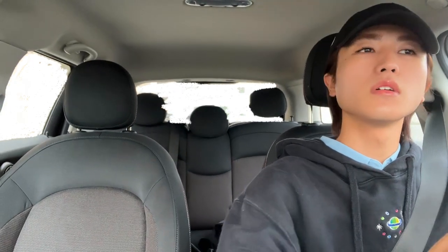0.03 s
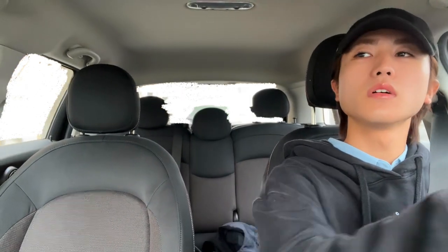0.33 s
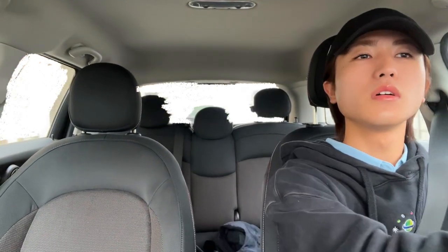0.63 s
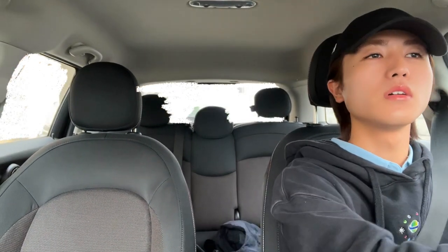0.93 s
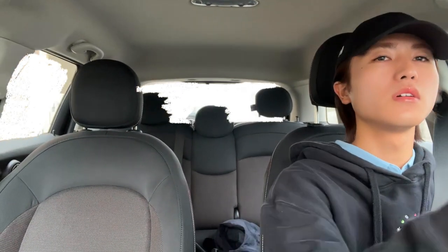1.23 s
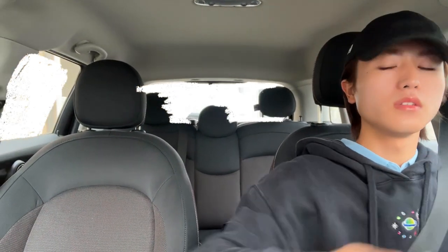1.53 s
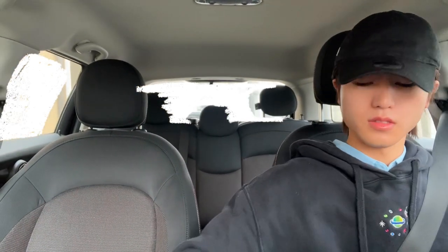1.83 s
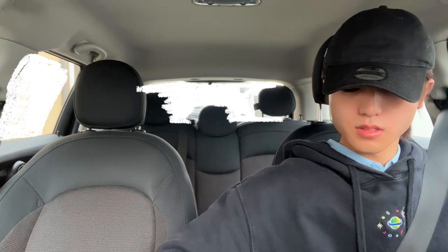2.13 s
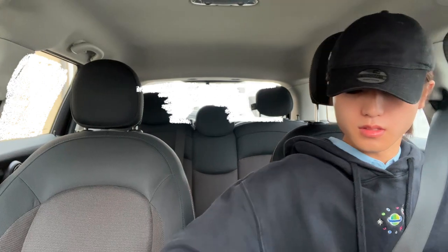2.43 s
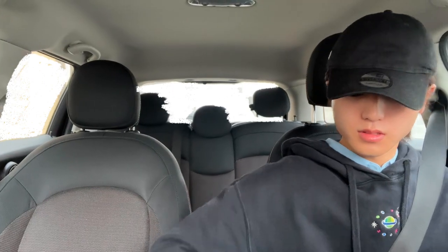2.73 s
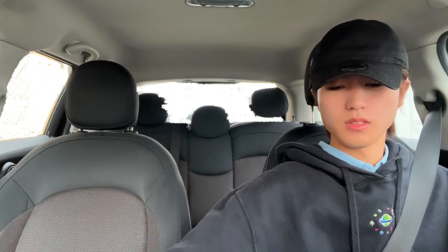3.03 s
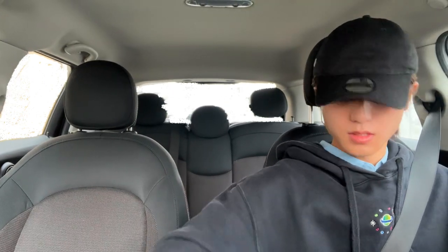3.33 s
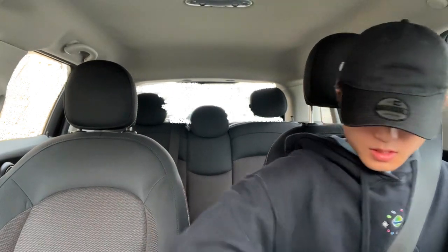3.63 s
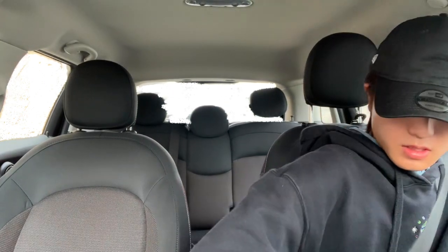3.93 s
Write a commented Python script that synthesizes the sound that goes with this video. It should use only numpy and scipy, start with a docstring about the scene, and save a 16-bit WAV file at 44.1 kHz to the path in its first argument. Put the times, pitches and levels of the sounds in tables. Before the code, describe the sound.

A car lever clicks and thuds home over an idling engine, then a seat belt buckle snaps.

```python
"""First comes the low throb of an idling engine, heard inside a car, and soon the swish of a sleeve.
Fingers scuff the console and seat belt fittings tick as the idle slows. A lever's catch clicks through
three notches and the lever thuds home, shaking the trim; then the belt buckle snaps and rattles.
Clicks are bursts of noise, most with short ringing tones. The padded cabin hardly echoes,
and two microphones close together pick it all up."""
import sys
import numpy as np
from scipy import signal
from scipy.fft import rfft, irfft
from scipy.io import wavfile

SR = 44100
rng = np.random.default_rng(int(sys.argv[2]) if len(sys.argv) > 2 else 0)


def waveform_to_disk(signal):
    """Save audio, clipped to [-1, 1], as 16-bit WAV at the path in sys.argv[1]."""
    frames = np.transpose(np.atleast_2d(signal))
    scaled = np.clip(frames, -1, 1) * 32767
    samples = np.round(scaled).astype(np.int16)
    wavfile.write(sys.argv[1], SR, samples)


N = 176400
TIME = np.arange(N) / SR
LEAD_S = .05  # room for a hit to swell before its peak
HIT_TIME = np.arange(SR // 3) / SR - LEAD_S
HIT_SIZE = len(HIT_TIME)


def amp(db):
    """Turns decibels into a number to multiply by."""
    return 10 ** (np.asarray(db) / 20)


def normalize(x):
    """Scales a signal to an average (rms) strength of 1."""
    return x / np.sqrt(np.mean(x ** 2) + 1e-20)


def lookup(table, x):
    """Reads between the rows of a two-column table."""
    return np.interp(x, *np.transpose(table))


def at_pitch(table, hz):
    """Reads between the rows of a frequency table, spacing octaves evenly."""
    row_hz, value = np.transpose(table)
    return np.interp(np.log(hz + 1), np.log(row_hz + 1), value)


def pan(db):
    """Two gains that make the left side db louder than the right."""
    return amp([[db / 2], [-db / 2]])


def add(mix, start_s, sound):
    """Mixes a sound in, cutting off whatever does not fit."""
    at = round(start_s * SR)
    sound = sound[:, max(-at, 0):]
    part = mix[:, max(at, 0):][:, :sound.shape[1]]
    part += sound[:, :part.shape[1]]


def drift(rate_hz):
    """A random wobble, moving up to about rate_hz times a second."""
    hz = np.fft.rfftfreq(N, 1 / SR)
    return normalize(irfft(rfft(rng.standard_normal(N)) * np.exp(-(hz / rate_hz) ** 2), N))


# Sound from all around. Each row: frequency in Hz, how alike the two sides are from -1 to 1.
SIDES_ALIKE = [(50,0.62),(120,1),(250,0.15),(700,-0.23),(2000,0.12),(8000,-0.35),(15000,-0.82)]
# Near sounds reach the left microphone first. Each row: frequency in Hz, head start in radians.
LEFT_LEAD = [(60,0.4),(150,0.62),(300,1.19),(800,0.96),(1400,.9),(2800,1.16),(5600,1.65),(8500,2.15),(15000,2.3)]
# Balance of near sounds. Each row: frequency in Hz, left level minus right in dB.
BALANCE = [(300,-4),(1200,-5),(2500,-2),(8000,-1.5),(14000,1)]

def noise(spectrum, size, tilt_db=0, near=False):
    """Stereo noise from nearby or all around; tilt_db brightens it per octave above 600 Hz."""
    hz = np.fft.rfftfreq(size, 1 / SR)
    if near:
        left = np.exp(2j * np.pi * rng.random((2, len(hz))))[0]
        right = left * np.exp(-1j * at_pitch(LEFT_LEAD, hz))
        sides = np.array([left, right]) * pan_by_pitch(hz)
    else:
        left, other = rfft(rng.standard_normal((2, size)))
        alike = at_pitch(SIDES_ALIKE, hz)
        sides = np.array([left, alike * left + np.sqrt(1 - alike ** 2) * other])
    octaves = np.log2(np.maximum(hz, 600) / 600)
    return normalize(irfft(sides * amp(at_pitch(spectrum, hz) + tilt_db * octaves), size))


def pan_by_pitch(hz):
    """Left and right gains of a near sound at each frequency."""
    return amp(at_pitch(BALANCE, hz) * np.array([[.5], [-.5]]))


def hit(rise_s, fade_s):
    """Loudness of a hit: a quick swell, then a fade. A fade time is how long it takes to drop 60 dB."""
    return np.exp(np.minimum(HIT_TIME, 0) / rise_s - np.log(1000) * np.maximum(HIT_TIME, 0) / fade_s)


def clack(rise_s, fade_s, crack_db=4.5):
    """Loudness of a hard contact: a sharp crack, then the rattle of the housing."""
    crack = amp(crack_db) * hit(rise_s / 2, fade_s=.0033)
    return np.hypot(crack, hit(rise_s, fade_s)) / np.sqrt(2)


def ring(tones, rise_s, in_step=False):
    """The fading tones of a struck part; a blunt push starts them all in step."""
    out = 0
    for hz, db, fade_s in tones:
        turn = 0 if in_step else rng.random()
        phase = 2 * np.pi * (hz * HIT_TIME + turn) - np.array([[0], [at_pitch(LEFT_LEAD, hz)]])
        out = out + amp(db) * pan_by_pitch(hz) * hit(rise_s, fade_s) * np.cos(phase)
    return out


# Engine speed. Each row: time in seconds, cycles per second.
ENGINE_SPEED = [(0.0, 24.64), (0.731, 24.59), (1.481, 25.74), (1.73, 25.15), (1.86, 23.45), (2.0, 23.06),
                (2.29, 23.29), (3.48, 23.09), (3.62, 23.29), (4.0, 23.09)]

def engine_cycles():
    """Counts the cycles the engine has run so far."""
    return np.cumsum(lookup(ENGINE_SPEED, TIME)) / SR


# The hum before and after the idle slows. Each row: multiple of engine speed, relative level in dB.
FAST_HUM = [(1, -4), (2, 0), (3, -2), (4, -2.5), (5, -10), (6, -20), (7, -22), (8, -25.5), (9, -10.5),
            (10, -33), (11, -16.5), (12, -28.5), (13, -40), (14, -17), (15, -19.5), (16, -32), (17, -33.5),
            (18, -39)]
SLOW_HUM = [(1, -38.5), (2, 0.5), (3, -3), (4, -8), (5, -15), (6, -33.5), (7, -21.5), (8, -14.5), (9, -23),
            (10, -21.5), (11, -14), (12, -11), (13, -13), (14, -42.5), (15, -10), (16, -10.5), (17, -14.5),
            (18, -26), (19, -22.5)]
# Boom of the three deepest tones. Each row: time in seconds, boost in dB.
BOOM = [(0,7),(.13,3),(.2,-0.5),(.6,2),(.9,-5.5),(1.25,-1),(1.6,-4.5),(1.95,-1),(2.9,-0.5),(3.6,0),(4,-5)]

def engine():
    """Wavering tones at multiples of the engine's speed; their balance shifts as it slows."""
    settle_middle_s, settle_length_s = 1.89, .57
    waver, waver_hz = .21, 6.9
    cycles = engine_cycles()
    settled = np.clip((TIME - settle_middle_s) / settle_length_s + .5, 0, 1)
    right_lag = .0049 * ENGINE_SPEED[0][1] * np.array([[0], [1]])  # radians, for the lowest tone
    out = np.zeros((2, N))
    for k in range(1, len(SLOW_HUM) + 1):
        level = (1 - settled) * amp(lookup(FAST_HUM, k) - 36) + settled * amp(lookup(SLOW_HUM, k) - 34)
        if k <= 3:
            level = level * amp(lookup(BOOM, TIME))
        scatter = .57 * np.sqrt(k) if k < 11 else .27  # high tones bunch up into one chug
        phase = 2 * np.pi * (k * cycles + scatter * rng.random()) + waver * drift(waver_hz)
        out += np.sqrt(2) * level * (1 + waver * drift(waver_hz)) * np.cos(phase - k * right_lag)
    return out * pan(-4)


# Tone of the rumble and cabin air. Each row: frequency in Hz, relative level in dB.
RUMBLE_TONE = [(12,-27),(28,-10),(48,-2),(110,-7),(190,-13),(280,-12),(400,-19.5),(500,-26),(750,-32.5),(1100,-42.5),(2000,-53.5),(4000,-56.5),(8500,-60.5),(10500,-82),(13000,-76.5),(15500,-64.5)]
# Rise and fall of the rumble. Each row: time in seconds, level in dB.
RUMBLE_LEVEL = [(0,-37),(.4,-40),(0.899,-36.5),(1.25,-40.5),(1.8,-33),(2.2,-35),(2.7,-35),(3.3,-38.5),(4,-36)]

def rumble():
    """Dull engine noise pulses with each cycle, under the steady hiss of cabin air."""
    air = noise(RUMBLE_TONE, N) * pan(-2.5)
    low = signal.sosfiltfilt(signal.butter(2, 1500, fs=SR, output="sos"), air)
    db = lookup(RUMBLE_LEVEL, TIME)
    swell = amp(db + 1.37 * drift(rate_hz=18))
    throb = 1 + .2 * np.cos(2 * np.pi * engine_cycles())
    return swell * throb * low + amp(db.mean()) * (air - low)


# Sleeve and belt strokes. Each row: middle in seconds, half length in seconds, level in dB,
# brightness in dB per octave.
STROKES = [(0.238,0.22,-61.5,2),(0.697,0.045,-60,3.2),(0.774,0.047,-55.5,4),(0.948,0.07,-62.5,4),(1.361,0.096,-61,1),(1.538,0.12,-58.5,-2.7),(1.853,0.13,-60,3),(2.071,0.09,-58,2),(2.231,0.036,-64.5,2.5),
           (2.414,0.015,-54,-0.5),(2.739,.11,-57.5,-1),(2.94,0.022,-62,-3),(3.073,0.015,-58.5,-8),(3.137,0.08,-57,-17),(3.328,0.032,-61,1.5),(3.519,0.19,-62,-2.5),(3.604,0.036,-48.5,-1),(3.733,0.26,-62.5,-1),(3.951,0.082,-52,-1.5)]
# Tone of rubbing fabric. Each row: frequency in Hz, relative level in dB.
CLOTH_TONE = [(200,-11),(500,1.5),(900,11.5),(1300,4),(1750,0),(2400,3.5),(3000,0),(4500,-2),(6500,0.5),(8700,-3),(10500,-34.5),(12500,-19.5),(14200,-3),(15800,-9.5)]

def cloth():
    """Fabric rubs in grainy swishes as the driver reaches down."""
    out = np.zeros((2, N))
    t = np.arange(SR) / SR - .5
    for middle_s, half_s, db, tilt_db in STROKES:
        swell = amp(db) * 2 ** -(t / half_s) ** 2
        add(out, middle_s - .5, swell * noise(CLOTH_TONE, SR, tilt_db))
    grain_db = 1.5 * drift(rate_hz=1000)
    flutter_db = .6 * drift(rate_hz=21)
    return out * amp(grain_db + flutter_db)


# How hard fingers brush the console. Each row: time in seconds, typical level in dB.
FINGER_LEVEL = [(0,-84),(1.2,-77),(1.5,-64),(2.3,-59.5),(2.7,-54.5),(3,-66.5),(3.1,-52),(3.25,-62.5),(3.45,-62),(4,-46)]
# Tone of one scuff. Each row: frequency in Hz, relative level in dB.
SCUFF_TONE = [(300,-8.5),(650,7),(1550,-1),(3500,-15.5),(8000,-30)]

def fingers():
    """Faint, dull scuffs on plastic come at random and blend into a rustle."""
    scuffs_per_s, spread_db = 42, 4
    out = np.zeros((2, N))
    for when, bright, force in rng.random((round(scuffs_per_s * N / SR), 3)):
        s = when * N / SR
        db = lookup(FINGER_LEVEL, s) + spread_db * (2 * force - 1)
        scuff = noise(SCUFF_TONE, HIT_SIZE, tilt_db=3 * (2 * bright - 1))
        add(out, s - LEAD_S, amp(db) * hit(rise_s=.0036, fade_s=.04) * scuff)
    return out


# Ticks of the buckle, belt fittings and console. Each row: time in seconds, level in dB,
# rise and fade in seconds, brightness in dB per octave, upper tone in Hz, its relative level in dB,
# lower tone in Hz, its relative level in dB.
TICKS = [(1.822,-56,0.0026,0.055,-3,2750,-4,1930,-1),(1.849,-51,0.0019,0.055,2,4350,-5,1810,0.5),(1.861,-55,.001,.06,-6,2780,-12,1980,4.5),
         (1.999,-42.5,.0011,0.16,4,1245,-5,1010,-8),(2.0358,-31,0.0022,0.049,4.5,1120,-3.5,800,-0.5),(2.121,-51.5,0.0052,0.081,5,1920,-9,1350,-14),
         (2.618,-42.5,0.0022,0.059,0,1720,-0.5,1380,-8),(2.623,-45,0.00095,.041,1,592,15.5,398,11),(3.08,-49.5,.001,0.072,10,1600,-6,1107,-5),(3.306,-38,.0018,0.06,-5,1250,-5.5,946,-2),
         (3.593,-42,0.0021,0.054,1.5,2010,-3,990,-7),(3.763,-47,0.0023,.066,2.5,1120,-4,806,-11),
         (3.913,-40,0.0046,0.061,1.5,1480,-9,1190,-9),(3.932,-46,0.0048,0.095,5,1420,-1,1226,9),(3.946,-34,0.0027,0.069,0,1435,4,1209,0.5)]
# Tone of their click. Each row: frequency in Hz, relative level in dB.
TICK_TONE = [(150,-10),(420,1),(620,0),(850,4),(1100,11),(1550,1),(1950,1),(2700,8.5),(3450,4),(4200,3.5),(6500,2.5),(8800,4.5),(10800,-30),(13000,-6),(15500,-6)]

def fittings():
    """Plastic and metal parts scrape into a click and ring briefly."""
    ring_s = .046
    out = np.zeros((2, N))
    for s, db, rise_s, fade_s, tilt_db, upper_hz, upper_db, lower_hz, lower_db in TICKS:
        click = clack(rise_s, fade_s) * noise(TICK_TONE, HIT_SIZE, tilt_db, near=True)
        tones = ring([(upper_hz, upper_db, ring_s), (lower_hz, lower_db, ring_s)], rise_s)
        add(out, s - LEAD_S, amp(db) * (click + tones + cabin_echo()))
    return out


# Tone of the cabin's echo. Each row: frequency in Hz, relative level in dB.
ECHO_TONE = [(200,-1.5),(400,15.5),(520,9),(800,7.5),(2000,-6.5),(5000,-10),(9000,-17),(11000,-45.5),(15500,-36.5)]

def cabin_echo():
    """The padded cabin answers a click with a short, dull puff of noise."""
    return amp(-13) * hit(rise_s=.001, fade_s=.11) * noise(ECHO_TONE, HIT_SIZE)


# Knocks on the buckle's anchor. Each row: time in seconds, level in dB.
KNOCKS = [(2.036,-36),(3.809,-27)]
# The anchor's tones. Each row: pitch in Hz, relative level in dB, fade in seconds.
ANCHOR_RING = [(109.7,-3.5,0.26),(220,-1.5,0.16),(275.3,-0.5,0.31),(342,0.5,0.054),(440,-3,0.15)]

def buckle_anchor():
    """Hard knocks set the buckle's anchor ringing with low tones."""
    out = np.zeros((2, N))
    for s, db in KNOCKS:
        add(out, s - LEAD_S, amp(db) * ring(ANCHOR_RING, rise_s=.0033))
    return out


# The lever's notches. Each row: time in seconds, level in dB, relative level of the first touch in dB.
NOTCHES = [(2.425,-17,-11),(2.4571,-16,-5),(2.481,-17.5,1.5)]
# Tone of the catch's rattle. Each row: frequency in Hz, relative level in dB.
CATCH_TONE = [(250,-19),(520,-17),(650,2.5),(850,3),(1000,-2),(1450,-11.5),(2000,4.5),(2650,-4),(2930,-1),(3100,-7.5),(3480,1.5),(3800,-10.5),(4500,1),(5350,-4.5),(6500,3),(7500,-2.5),(8450,10),(10000,-16.5),(11500,-55.5),(13200,-7),(15000,3),(16200,-28.5)]
# Tones of the lever and the console. Each row: pitch in Hz, relative level in dB, fade in seconds.
LEVER_RING = [(727,-11,0.06),(804.4,-9.5,0.093),(846,-11,.04),(1930,-16.5,.075),(2080,-19.5,.075),(2870,-19.5,0.076),(3550,-22,0.097),(6260,-13.5,0.062),(8600,-5,.03)]
CONSOLE_RING = [(105,-2,0.074),(162,-2.5,0.059),(203.5,1.5,0.038),(253.4,-6,0.14),(407,-7.5,0.13)]

def lever_notches():
    """At each notch the lever's catch touches, snaps in and knocks the console."""
    touch_early_s, knock_late_s = .0029, .0121
    alike = .89  # how closely the rattle repeats from notch to notch
    snap = clack(rise_s=.00094, fade_s=.054, crack_db=-4.5)
    touch = np.interp(HIT_TIME + touch_early_s, HIT_TIME, snap)
    tones = ring(LEVER_RING, rise_s=.0008)
    housing = noise(CATCH_TONE, HIT_SIZE, near=True)
    knock = amp(-5.5) * ring(CONSOLE_RING, rise_s=.0058, in_step=True)
    out = np.zeros((2, N))
    for s, db, touch_db in NOTCHES:
        rattle = alike * housing + np.sqrt(1 - alike ** 2) * noise(CATCH_TONE, HIT_SIZE, near=True)
        click = np.hypot(snap, amp(touch_db) * touch) * rattle
        add(out, s - LEAD_S, amp(db) * (click + tones + cabin_echo() + trim_shudder()))
        add(out, s + knock_late_s - LEAD_S, amp(db) * knock)
    return out


# Tone of the console's loose trim. Each row: frequency in Hz, relative level in dB.
TRIM_TONE = [(30,-18.5),(60,5.5),(130,1.5),(240,2.5),(400,-7),(520,-25.5),(1000,-44.5),(4000,-70)]

def trim_shudder():
    """Loose trim gives a low shake after a knock."""
    return amp(-9.5) * hit(rise_s=.0023, fade_s=.23) * noise(TRIM_TONE, HIT_SIZE, near=True)


# Slides of the lever. Each row: middle in seconds, half length in seconds, level in dB.
SLIDES = [(2.547,0.033,-29.5),(2.706,0.02,-32)]

def lever_slide():
    """The trim rattles as the lever judders along its slot."""
    swells = sum(amp(db) * 2 ** -((TIME - middle_s) / half_s) ** 2 for middle_s, half_s, db in SLIDES)
    return swells * noise(TRIM_TONE, N, near=True)


# Thuds of the lever. Each row: time in seconds, level in dB.
THUDS = [(2.554,-31.5),(2.6244,-16),(2.632,-15),(2.686,-34),(2.743,-35.5)]
# Tones of its soft stop. Each row: pitch in Hz, relative level in dB, fade in seconds.
STOP_RING = [(90,-27.5,0.076),(123,-2.5,0.02),(174,-1.5,0.051),(293,-7.5,0.053),(347.6,-4,0.049),(425,-18.5,0.16)]

def lever_thuds():
    """The lever bumps its soft stop and shakes the trim."""
    thud = ring(STOP_RING, rise_s=.0094, in_step=True)
    out = np.zeros((2, N))
    for s, db in THUDS:
        add(out, s - LEAD_S, amp(db) * (thud + trim_shudder()))
    return out


# The latch slides, then lets go. Each row: time in seconds, level in dB, rise and fade in seconds.
LATCH_SNAPS = [(3.7992,-21.5,0.0041,0.076),(3.8013,-19,0.00064,0.059)]
# Tone of the latch. Each row: frequency in Hz, relative level in dB.
LATCH_TONE = [(200,-21),(560,-17),(900,2),(1100,6.5),(1480,11.5),(1750,-1),(2000,1),(2500,5),(2850,-2.5),(3450,10.5),(4000,1.5),(4400,8),(5200,-4.5),(6000,7.5),(9000,2),(10500,-13.5),(14300,6),(16000,-9)]

def buckle_latch():
    """The latch scrapes and snaps inside the buckle's hollow shell."""
    out = np.zeros((2, N))
    for s, db, rise_s, fade_s in LATCH_SNAPS:
        snap = clack(rise_s, fade_s) * noise(LATCH_TONE, HIT_SIZE, near=True)
        add(out, s - LEAD_S, amp(db) * (snap + cabin_echo()))
    return out


def scene():
    """Adds up everything heard in the cabin."""
    background = engine() + rumble() + cloth()
    lever = lever_notches() + lever_thuds() + lever_slide()
    belt = buckle_latch() + fittings() + buckle_anchor()
    return background + lever + belt + fingers()


def record(dry):
    """Cuts off the very highest treble."""
    low_pass = signal.firwin(511, cutoff=16250, window=("kaiser", 9), fs=SR)
    return signal.oaconvolve(dry, low_pass[None], "same")


dry = scene()
out = record(dry)
waveform_to_disk(out)
```